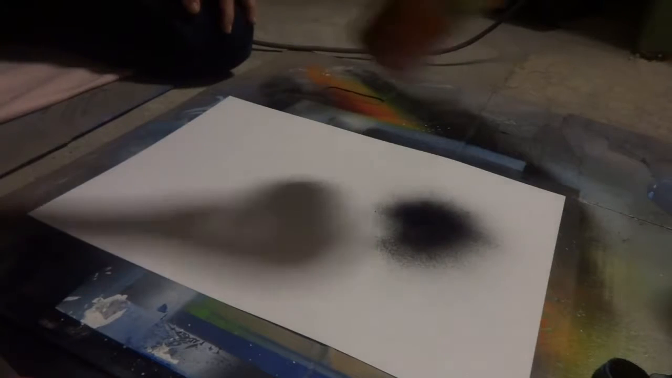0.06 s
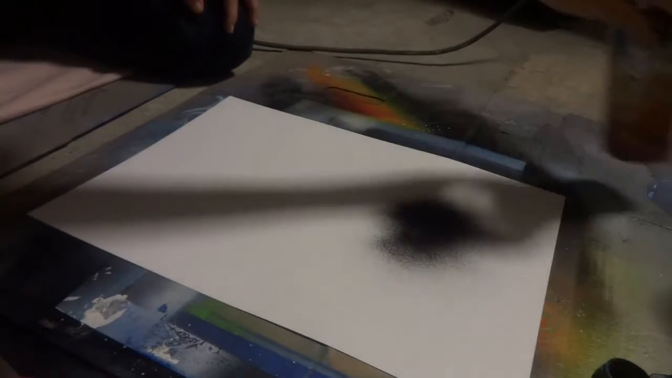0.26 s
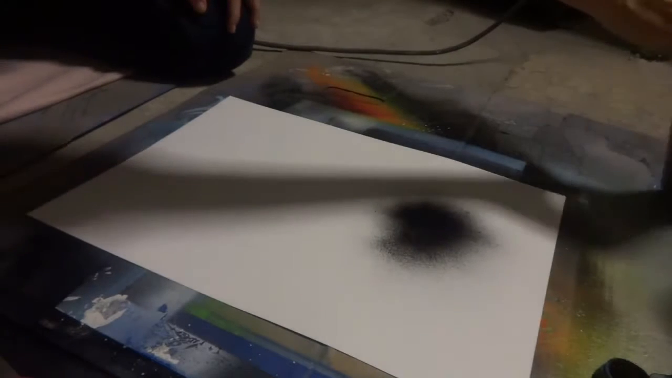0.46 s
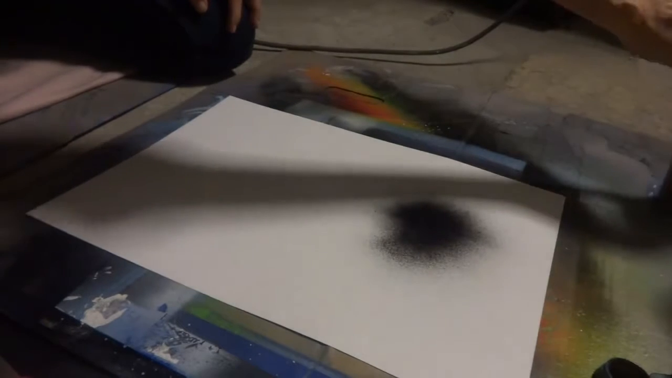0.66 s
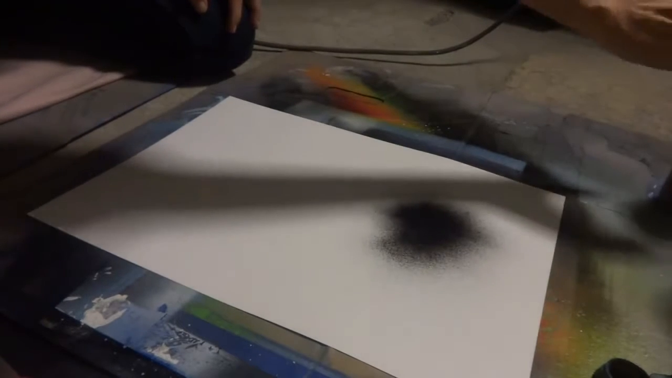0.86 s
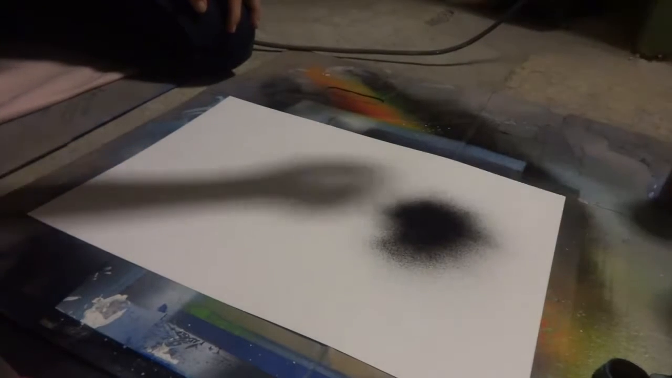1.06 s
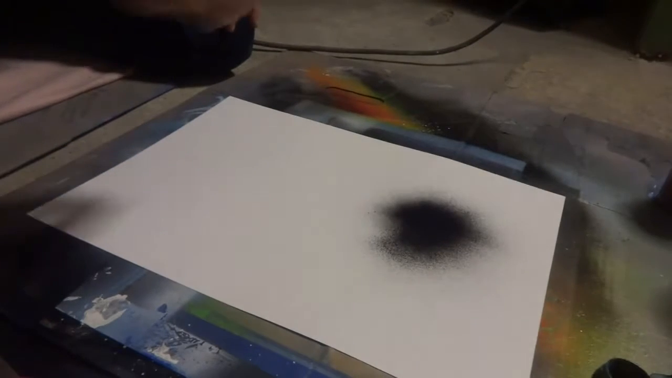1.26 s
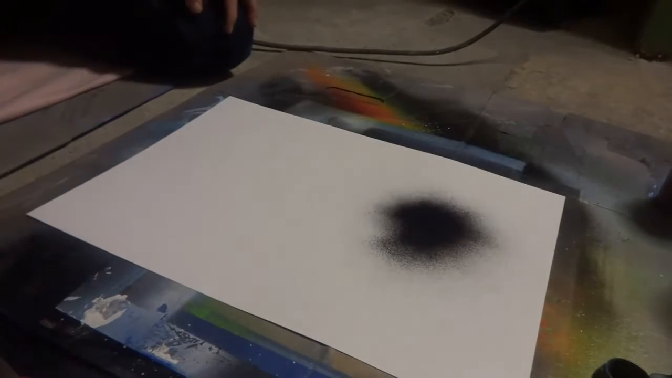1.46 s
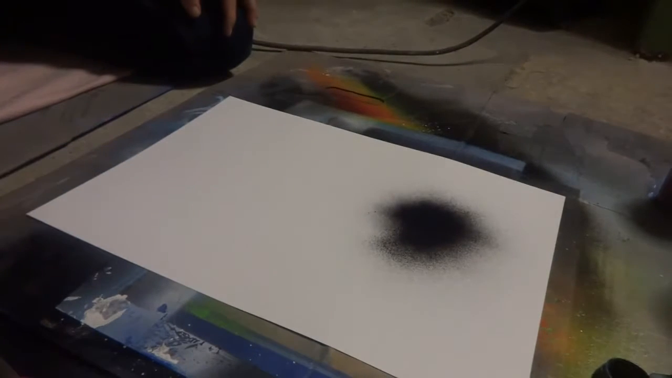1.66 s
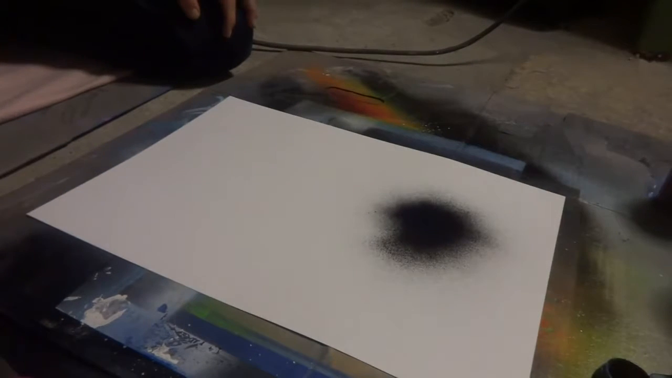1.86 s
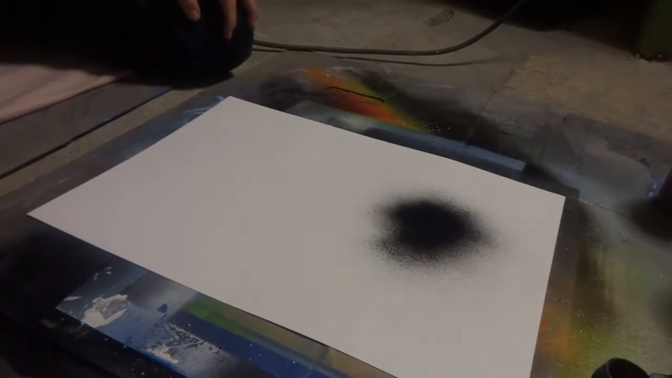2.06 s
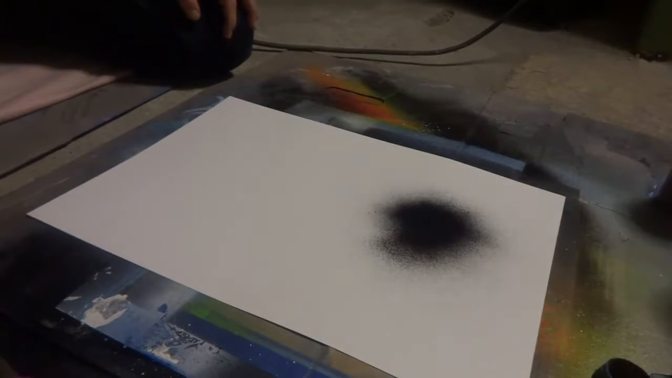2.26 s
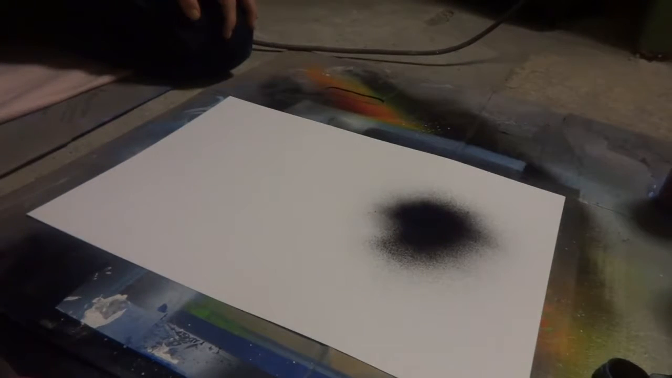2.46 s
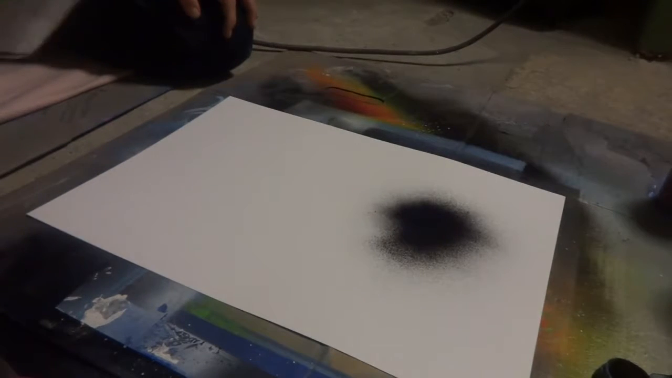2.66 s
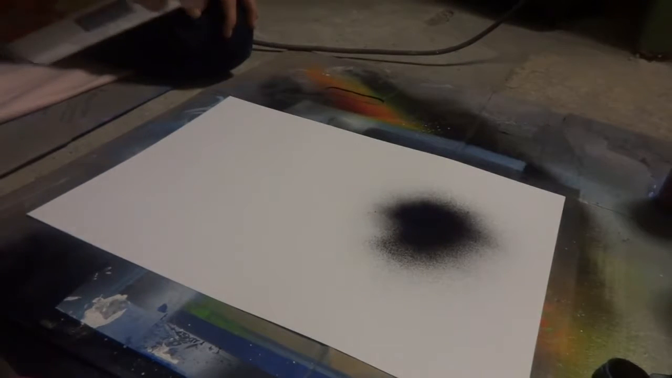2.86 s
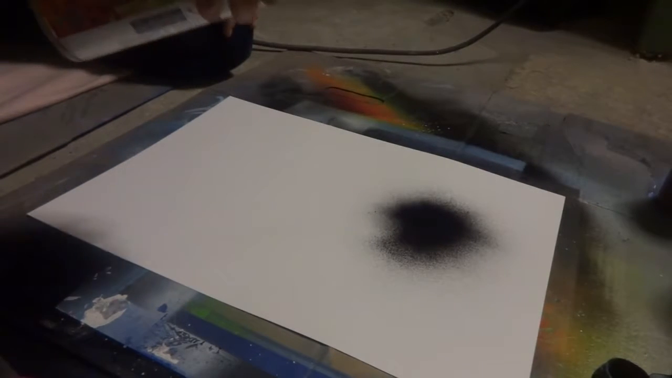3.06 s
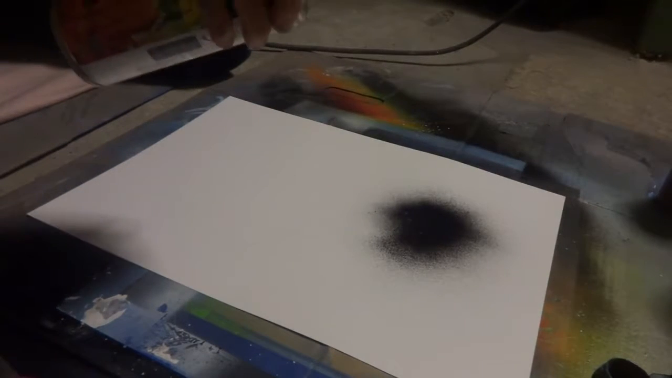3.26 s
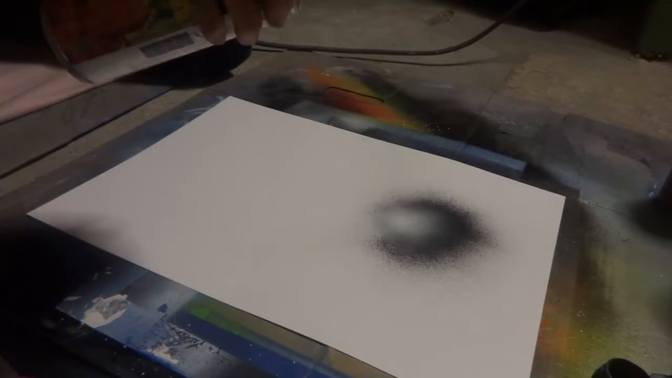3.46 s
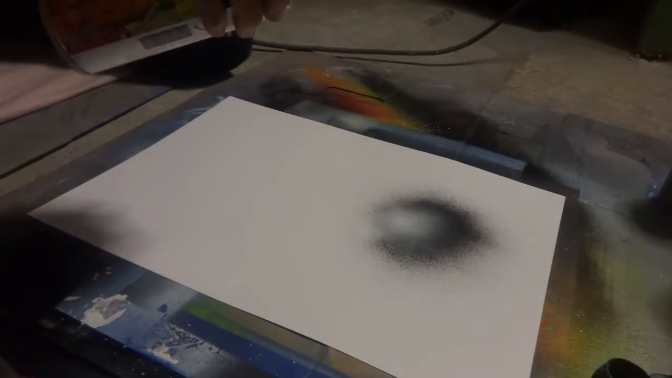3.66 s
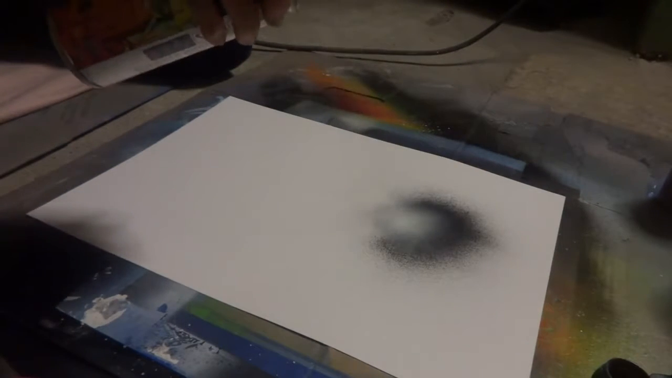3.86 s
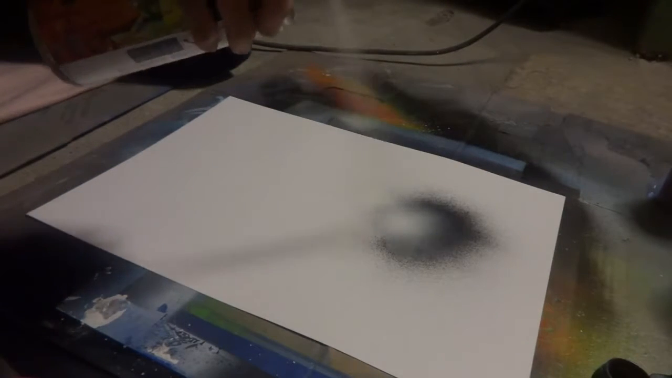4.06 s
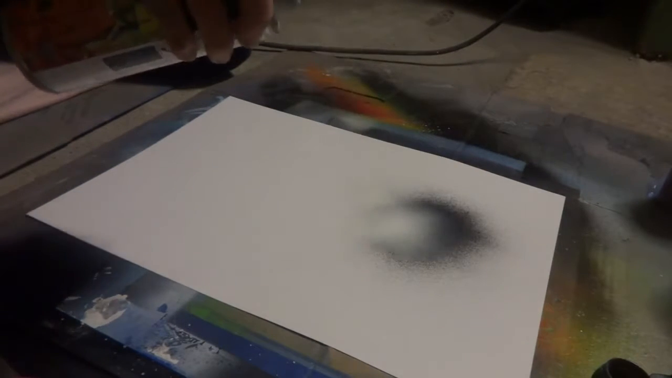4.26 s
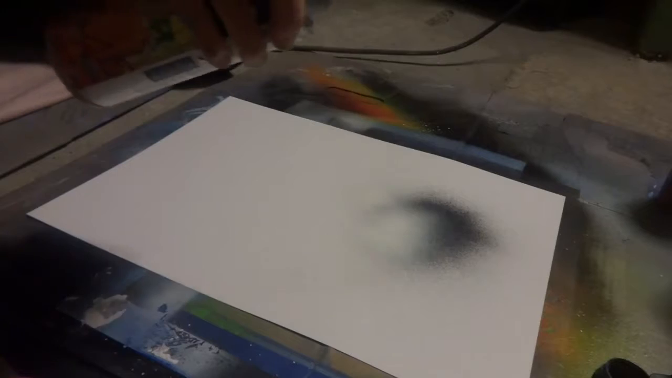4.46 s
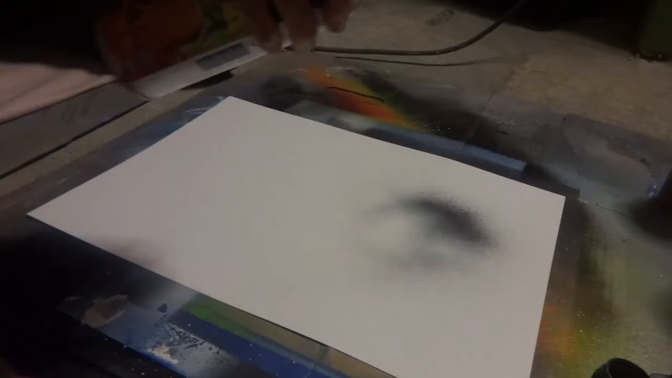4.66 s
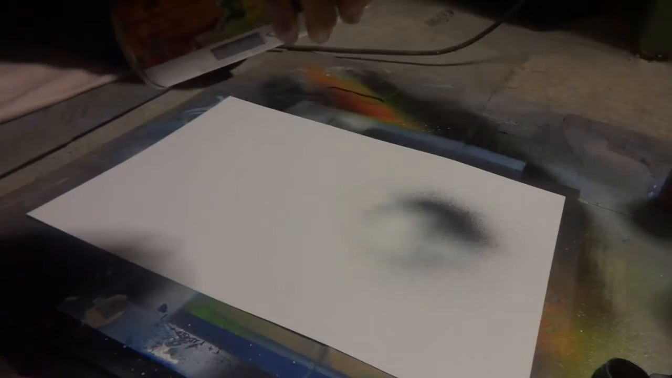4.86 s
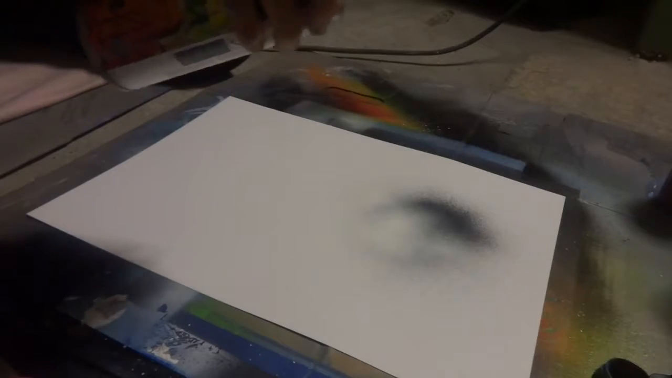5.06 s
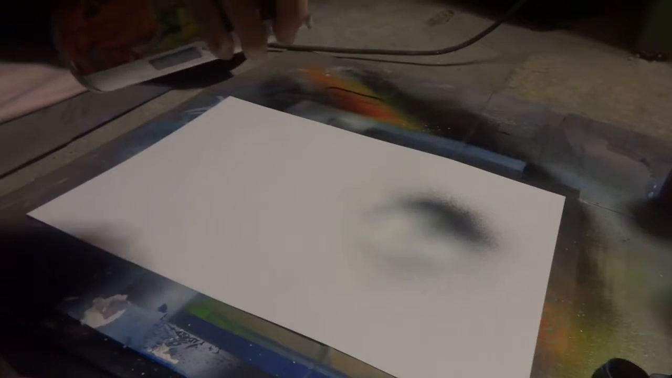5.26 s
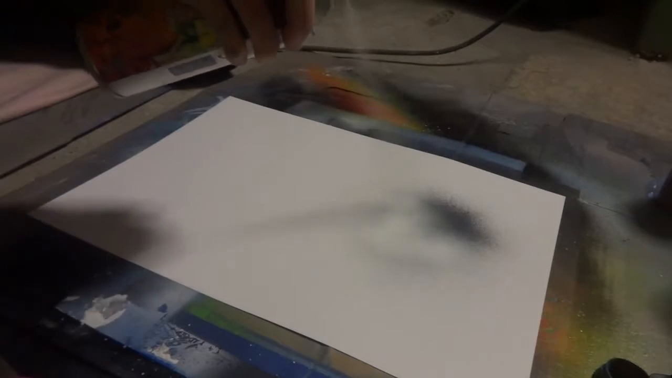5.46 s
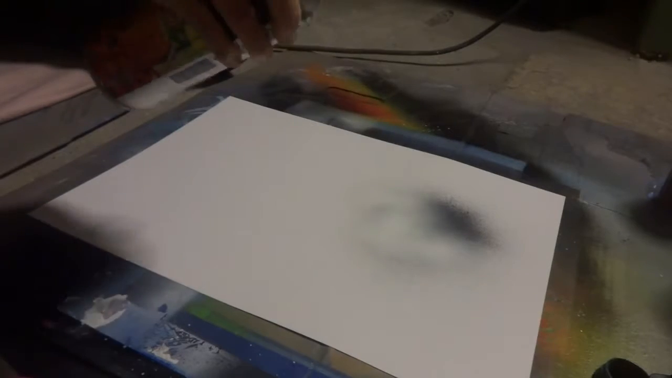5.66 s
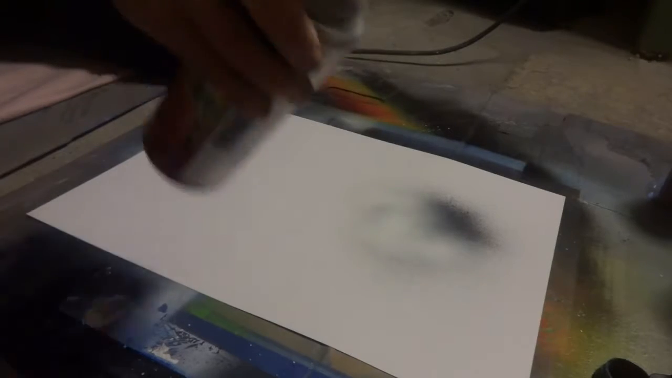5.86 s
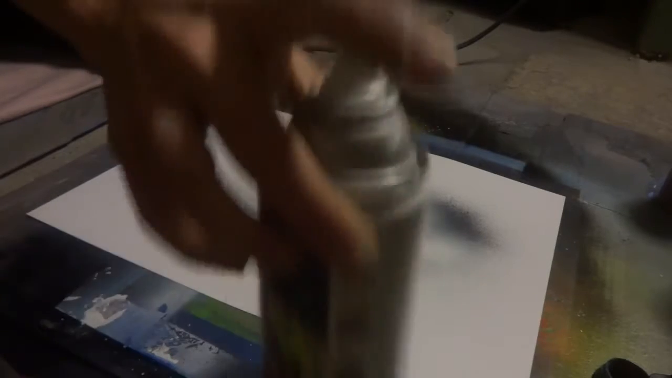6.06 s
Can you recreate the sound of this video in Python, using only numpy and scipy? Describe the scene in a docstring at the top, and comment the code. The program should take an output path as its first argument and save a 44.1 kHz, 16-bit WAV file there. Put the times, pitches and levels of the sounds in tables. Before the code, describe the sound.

A small workshop with a short echo and a soft low rumble is heard throughout, with the action close by. After a faint rustle and tap, a spray paint can is set on the floor at about 0.5 seconds with a few knocks and a soft thump. It rocks on its rim, slightly to the right, ticking and ringing until 1.1 seconds. Around 1.7 seconds another can slides faintly, then is knocked with a sharp clatter at 2 seconds. From 2.2 to 3 seconds it is lifted and tilted: the mixing ball rolls and clicks against the metal wall over light sleeve rustle. A weak puff at 3.1 seconds starts about eight short, bright hisses of paint onto paper, the loudest sounds, roughly three a second, with a brief pause near 4.9 and ending at 5.6. Faint ball rolling, two small clicks and rustling follow until about 6 seconds.

```python
"""Cans clatter, a mixing ball clicks, then eight short bursts of spray paint hiss in a small workshop.
One can is put down and rocks on its rim until it rests. Another slides, is knocked, and is picked up
and tilted, so the ball inside rolls and taps the wall, which rings. Each press of the nozzle lets out
a jet of swirling gas that hisses and rushes onto paper. The room echoes and rumbles softly."""
import sys
import numpy as np
from scipy import signal
from scipy.fft import rfft, irfft
from scipy.io import wavfile
from scipy.ndimage import uniform_filter1d, map_coordinates

SR = 44100
rng = np.random.default_rng(int(sys.argv[2]) if len(sys.argv) > 2 else 0)


def dump(signal):
    """Clip the signal to [-1, 1] and save it as 16-bit WAV at the path in sys.argv[1]."""
    limited = np.clip(np.atleast_2d(signal).T, -1, 1)
    pcm = np.round(limited * 32767).astype(np.int16)
    wavfile.write(sys.argv[1], SR, pcm)


N = 269892
TIME, FREQS = np.arange(N) / SR, np.fft.rfftfreq(N, 1 / SR)


def spray(closing_s=0.062, full_press_db=-23, sputter_db=0.87):
    """Each press opens a valve: swirling gas hisses out and rushes onto the paper."""
    # nozzle presses: t/s, opening time/s, length/s, level/dB, pressure swell/dB, floor echo delay/ms
    presses = [(3.079, 0.037, .126, -37.5, -1.5, .8), (3.353, 0.01, 0.081, -36, 0, 0.8),
               (3.376, 0.017, .141, -23.5, .5, .72), (3.72, .02, 0.16, -24.5, 1, 0.75),
               (4.051, .018, .17, -23.5, -0.5, 0.78), (4.321, 0.023, .152, -21, -1.1, 0.78),
               (4.57, 0.021, 0.13, -20.5, -2.5, 0.81), (5.126, 0.015, 0.16, -26, 3, 0.77),
               (5.417, 0.017, 0.14, -23, 0, 0.75)]
    # tone of the jet: f/Hz, level/dB
    jet_tone = [(300, -43.5), (1000, -30), (1700, -24), (2100, -14), (2400, -8.5), (3200, -10),
                (4400, -8.5), (5500, -6.5), (8000, -3), (10200, -1), (13000, 1.5), (15800, -3)]
    # resonances of the can and nozzle: f/Hz, width/Hz, boost/dB
    nozzle_modes = [(2365, 500, -1), (3980, 270, -0.5), (4770, 470, 2.5), (6090, 720, 4), (8060, 750, 3),
                    (9080, 520, -5), (10200, 1120, 4)]
    # tone of the jet hitting the paper: f/Hz, level/dB
    paper_tone = [(200, -13), (550, -6), (900, -2.5), (1500, 1.5), (2200, 5), (4000, -16), (8000, -27)]
    # echoes off farther surfaces: delay/ms, level/dB
    surfaces = [(1.999, -15), (3.7, -21.5), (5.199, -19)]
    nozzle_db = sum(db * np.exp(-(2 * (FREQS - hz) / width) ** 2) for hz, width, db in nozzle_modes)
    tone_db = look_up(jet_tone, FREQS) + nozzle_db
    octaves = np.log2(np.maximum(FREQS, 2000) / 9000)
    gas, jet = rfft(rng.standard_normal(N)), np.zeros(N)
    rush = normalise(filtered(rng.standard_normal(N), look_up(paper_tone, FREQS) + bass_cut(FREQS, 250)))
    for start, opening, length, db, swell_db, echo_ms in presses:
        t, force_db = TIME - start, db + swell_db - full_press_db
        # the valve leaks a little before it gives way, and its spring shuts it smoothly
        valve = np.clip(t / opening, 0, 1) ** 2.15
        valve *= np.sin(np.pi / 2 * np.clip((length - t) / closing_s, 0, 1)) ** 2
        swell = np.sin(np.pi * np.clip(t / length, 0, 1))
        # the floor echo depends on the nozzle's height, so each burst has its own tone
        floor_echo = amp(-11) * np.exp(-2j * np.pi * FREQS * echo_ms / 1000)
        tilt_db = 0.26 * force_db * octaves  # a lighter press is duller
        hiss = normalise(irfft(gas * amp(tone_db + tilt_db) * (1 + floor_echo), N))
        hiss_db = db + swell_db * (2 * swell - 1)
        rush_db = -51.5 + 1.8 * force_db + 5 * (swell - 1)
        jet += valve * (amp(hiss_db) * hiss + amp(rush_db) * rush)
    jet *= amp(sputter_db * drift(rate_hz=280))
    # the echo delays waver as the hand sways
    return jet + sum(amp(db) * delayed(jet, ms * (1 + 0.0297 * drift(1.96))) for ms, db in surfaces)


def knocks(thump_hz=88, thump_fade_s=0.12):
    """Cans hit the floor and each other: a bouncing crack, a chattering rim, sometimes a thump."""
    # hits: t/s, relative level/dB, treble cutoff/Hz, pitch of the struck spot/Hz, its boost/dB
    hits = [(.009, -49, 3500, 1280, 8), (.421, -53.5, 2500, 1340, 11), (.449, -43, 1670, 1380, 11),
            (0.6169, -35.5, 2280, 556, 9), (.625, -37.5, 2600, 1250, 15.5), (.841, -48, 5000, 2610, 2),
            (.888, -51, 5000, 900, 7), (1.933, -48.5, 5000, 1500, 4), (1.9448, -29, 4000, 1010, 5),
            (1.977, -26, 4730, 1640, 7.5), (2.0208, -31, 6100, 800, 3)]
    # tone of every knock: f/Hz, level/dB
    knock_tone = [(60, -23), (200, -10.5), (400, -2.5), (700, 1.5), (1150, -5), (1700, -4.5), (2500, -2),
                  (3800, -2), (5000, -9.5), (6500, -3.5), (10000, -6), (15500, -15)]
    # the floor thumps under a can that is put down: t/s, level/dB
    thumps = [(.449, -47.5), (0.6174, -55)]
    t, out = np.arange(SR // 3) / SR, np.zeros(N)
    for start, db, cutoff_hz, spot_hz, boost_db in hits:
        contact = bounces(t) + amp(-19) * crack(t, decay_s=0.015)  # the longer crack is the chatter
        knock = filtered_hit(contact, lambda hz: look_up(knock_tone, hz) + treble_cut(hz, cutoff_hz)
                             + boost_db / (1 + (5 * (hz / spot_hz - 1)) ** 2))
        add(out, start, at_level(knock, db - 1))
    for start, db in thumps:
        add(out, start, amp(db) * fade(t, thump_fade_s) * np.sin(2 * np.pi * thump_hz * t))
    return out


def bounces(t, crack_s=0.0022, gap_s=0.004, first_db=-11, loss_db=4.5):
    """A can hits once, then bounces three times at uneven gaps, weaker each time."""
    contact = crack(t, crack_s)
    for k, start in enumerate(np.cumsum(gap_s * rng.uniform(0.5, 1.5, 3))):
        add(contact, start, amp(first_db - k * loss_db) * crack(t, crack_s))
    return contact


def crack(t, decay_s):
    """Two hard things touch: a brief burst of noise, about equally strong at all pitches."""
    burst = rfft(rng.standard_normal(len(t)) * np.exp(-t / decay_s))
    even = irfft(burst / (abs(burst) + 1e-9), len(t))
    return even * np.exp(-(t / (4 * decay_s)) ** 2) * np.sqrt(decay_s * SR / 2)


def rocking_can():
    """The standing can rocks, and rings each time its rim taps the floor."""
    # taps of the rim: t/s, relative level/dB
    taps = [(.7515, -39.5), (.807, -41.5), (.824, -48), (.9395, -36), (1.024, -39.5), (1.1045, -45),
            (1.127, -51)]
    # ringing tones of the can: f/Hz, level/dB, time to fade by 60 dB/s
    modes = [(573, 4, 0.061), (660, 9, 0.026), (840, -12.5, 0.032), (919, -8.5, 0.56), (1300, -10.5, 0.081),
             (1857, -8, 0.07), (1960, -12.5, 0.17), (2690, -8, 0.13), (2820, -21, .05), (4270, 4, 0.032),
             (4500, -4.5, 0.024), (4640, -0.5, 0.041), (5604, -1.5, 0.04), (5800, -16, 0.12),
             (7000, -16, .04)]
    return amp(-0.5) * struck_can(taps, modes, tick_db=8.5, tick_s=0.0028, tick_hz=4900, low_hz=293,
                                  vary_db=-1.0, detune=0.0035, bright_hz=6200, octave_db=7.5)


def ball_clicks():
    """The mixing ball strikes the wall of the held can; the hand damps the ringing."""
    # strikes of the ball: t/s, relative level/dB
    clicks = [(2.2544, -52), (2.4529, -39), (2.6435, -36), (2.698, -39), (2.712, -43), (2.735, -44.5),
              (2.795, -46), (2.817, -47), (2.823, -41), (2.9588, -30), (5.683, -54), (5.987, -53.5)]
    # ringing tones of the can: f/Hz, level/dB, time to fade by 60 dB/s
    modes = [(2004, -10, 0.056), (2363, -6.5, 0.052), (2670, -8, 0.051), (3140, -2.5, 0.055),
             (3420, -8.5, 0.076), (3570, -9, 0.039), (4430, 4, 0.033), (4760, 1, 0.026), (4790, -3, 0.067),
             (5140, -10, .05), (6930, -12, 0.026), (7620, -3, 0.04), (8030, -7.5, 0.05), (9076, -27, .04),
             (11800, -24, .05)]
    return amp(-1.5) * struck_can(clicks, modes, tick_db=8.0, tick_s=0.0017, tick_hz=9100, low_hz=1660,
                                  vary_db=3, detune=0.0095, bright_hz=10400, octave_db=14)


def struck_can(blows, modes, tick_db, tick_s, tick_hz, low_hz, vary_db, detune, bright_hz, octave_db):
    """Each blow ticks and rings the can, a little differently each time as the paint sloshes."""
    t, out = np.arange(SR // 2) / SR, np.zeros(N)
    mode_hz, mode_db, fade_s = np.transpose(modes)[:, :, None]
    hardest_db = max(db for start, db in blows)
    for start, db in blows:
        cutoff_hz = bright_hz * 2 ** ((db - hardest_db) / octave_db)  # softer blows are duller
        size, shift, phase = rng.standard_normal((3, *mode_hz.shape))
        tones = np.sin(2 * np.pi * (mode_hz * (1 + detune * shift) * t + phase))
        ring = (amp(mode_db + vary_db * size) * fade(t, fade_s) * tones).sum(0)
        tick = amp(tick_db) * filtered_hit(crack(t, tick_s), lambda hz: treble_cut(hz, tick_hz))
        blow = filtered_hit(ring + tick, lambda hz: treble_cut(hz, cutoff_hz) + 2 * bass_cut(hz, low_hz))
        add(out, start, at_level(blow, db))
    return out


def rolling_ball(level_db=-3, sag_per_s=0.15):
    """The ball skips along the wall and keeps it ringing; running paint lowers the pitch."""
    # one roll for each tilt of the can: t/s, length/s, relative level/dB, pitch factor
    rolls = [(0, .25, -67.5, 1.08), (2.19, 0.21, -59, 0.96), (2.37, .18, -54, 0.92),
             (2.595, .29, -52.5, 0.91), (5.665, 0.2, -64.5, .98), (5.785, 0.042, -53, 0.98)]
    # resonances of the wall, before the pitch factor: f/Hz, width/Hz, level/dB
    modes = [(2415, 290, 7), (3160, 370, -3.5), (3650, 370, -1), (4570, 270, -11), (4940, 620, -4),
             (7860, 4400, -15.5)]
    ring = resonate(grains(per_s=2500, spread_db=2.0), modes)
    gain, pitch = np.zeros(N), np.ones(N)
    for start, length, db, factor in rolls:
        gain += movement(start, length, db)
        from_middle_s = np.minimum(TIME - start, length) - length / 2
        pitch = np.where(TIME < start, pitch, factor * (1 - sag_per_s * from_middle_s))
    return amp(level_db) * gain * map_coordinates(ring, [np.cumsum(pitch)], order=3, mode="wrap")


def rustle(level_db=-3):
    """Sleeve and fingers rub in many tiny contacts whenever the hand moves."""
    # moves of the hand: t/s, length/s, relative level/dB
    moves = [(0, 0.046, -60), (0.088, 0.22, -61.5), (.155, 0.035, -59), (0.497, .018, -59),
             (0.587, .45, -63), (2.193, 0.81, -63.5), (5.718, 0.43, -63.5)]
    # tone of cloth and skin: f/Hz, level/dB
    cloth_tone = [(300, -15), (1300, -6), (2000, -8), (3000, 2.5), (6000, 4.5), (9000, 1.5), (15500, -4.5)]
    rubbing = normalise(filtered(grains(per_s=2200, spread_db=2.5), look_up(cloth_tone, FREQS)))
    return amp(level_db) * sum(movement(*move) for move in moves) * rubbing


def sliding_can():
    """Grit under the rim keeps a sliding can faintly ringing."""
    # resonances of the can: f/Hz, width/Hz, level/dB
    modes = [(1253, 72, 0), (1570, 24, -8), (1867, 48, -6)]
    ring = resonate(grains(per_s=2500, spread_db=3.5), modes)
    return movement(start=1.675, length=0.45, db=-70.5) * ring


def spray_echoes(hiss, turns_per_s=3):
    """The echoes change as the jet moves; it points at the paper, so less treble reaches the room."""
    # stereo width: f/Hz, side minus mid/dB
    width = [(500, -2), (1200, -3.5), (2200, -46), (3500, -27), (4800, -7.5), (7000, -7.5), (10000, -8.5),
             (15000, -20.5)]
    # hiss that reaches the room: f/Hz, gain/dB
    spill = [(1000, -4), (3000, -8), (6000, -7.5), (12000, -13.5)]
    spilled = filtered(hiss, look_up(spill, FREQS))
    angle = 2 * np.pi * turns_per_s * TIME
    return room(spilled * np.cos(angle), width) + room(spilled * np.sin(angle), width)


def room(x, width, echoes_per_s=5000, first_s=0.0023, build_s=0.0048):
    """Dense echoes build up quickly, then fade at a different speed for each pitch."""
    # how long the room rings: f/Hz, time to fade by 60 dB/s
    fade_times = [(150, 0.1368), (500, 0.17), (1300, 0.35), (3500, 0.3), (9000, 0.26), (15000, 0.21)]
    echoes = rng.choice([-1., 1.], (2, SR // 2)) * (rng.random((2, SR // 2)) < echoes_per_s / SR)
    hz, t, bands = signal.stft(echoes, SR, nperseg=256)
    tail = signal.istft(bands * fade(t, look_up(fade_times, hz)[:, None]), SR, nperseg=256)[1]
    tail *= np.clip((np.arange(tail.shape[1]) / SR - first_s) / build_s, 0, 1)
    tail /= np.linalg.norm(tail, axis=1, keepdims=True)
    mid, side = signal.fftconvolve(x[None], tail, axes=1)[:, :N]
    return stereo(mid, side, width)


def room_rumble(level_db=-61.0):
    """The room's low rumble slowly swells and sinks under a faint, even hiss."""
    # tone of the background: f/Hz, level/dB
    air_tone = [(25, -25.5), (40, -16), (52, -9.5), (70, -20), (100, 0), (130, -8.5), (170, -0.5),
                (240, -7), (310, -1), (400, -7.5), (520, -11.5), (700, -16.5), (2200, -22), (15800, -32.5)]
    # rise and fall of the rumble: t/s, relative level/dB
    swells = [(0.0, -56.5), (0.25, -66), (1.07, -58), (1.58, -63.5), (3.66, -62), (4.09, -67.5),
              (5.83, -61.5), (6.12, -64)]
    # stereo width: f/Hz, side minus mid/dB
    width = [(30, -16), (80, -15.5), (160, -9.5), (330, -3.5), (700, 2.5), (1400, 4), (6500, -3.5),
             (15000, -21)]
    mid, side = (normalise(filtered(rng.standard_normal(N), look_up(air_tone, FREQS))) for _ in range(2))
    air = amp(level_db) * stereo(mid, side, width)
    low = filtered(air, treble_cut(FREQS, 960))
    swell_db = np.interp(TIME, *np.transpose(swells))
    return air - low + low * amp(swell_db - swell_db.mean())


def movement(start, length, db, rise_share=0.11, fall_share=0.57):
    """Loudness of one movement as it speeds up, holds and slows down."""
    progress = (TIME - start) / length
    speed = np.clip(np.minimum(progress / rise_share, (1 - progress) / fall_share), 0, 1)
    return amp(db) * np.sin(np.pi / 2 * speed)


def grains(per_s, spread_db):
    """Tiny contacts of uneven size at random times."""
    size = amp(spread_db * np.minimum(rng.exponential(1, N), 4))
    return normalise(size * rng.standard_normal(N) * (rng.random(N) < per_s / SR))


def drift(rate_hz):
    """A smooth random wobble, up to about rate_hz swings a second."""
    return normalise(irfft(rfft(rng.standard_normal(N)) * np.exp(-(FREQS / rate_hz) ** 2), N))


def resonate(x, modes):
    """Keeps the pitches at which an object likes to ring."""
    peaks = sum(amp(db) / (1 + (2 * (FREQS - hz) / width) ** 2) for hz, width, db in modes)
    return normalise(irfft(rfft(x) * peaks, N))


def filtered(x, db):
    """Turns each pitch in FREQS up or down by its gain in dB."""
    return irfft(rfft(x) * amp(db), N)


def filtered_hit(x, db_at_hz):
    """Filters a short sound so that nothing rings before it starts (minimum phase)."""
    log_gain = np.log(amp(db_at_hz(abs(np.fft.fftfreq(4096, 1 / SR)))))
    taps = np.fft.ifft(np.exp(np.conj(signal.hilbert(log_gain)))).real
    return signal.fftconvolve(x, taps[:len(taps) // 2])[:len(x)]


def treble_cut(hz, cutoff_hz):
    """Gain in dB that dulls high pitches."""
    return -10 * np.log10(1 + (hz / cutoff_hz) ** 3)


def bass_cut(hz, cutoff_hz):
    """Gain in dB that thins low pitches."""
    return treble_cut(cutoff_hz, hz + 20)


def fade(t, fade_s):
    """Dies away by 60 dB in fade_s."""
    return np.exp(-np.log(1000) * t / fade_s)


def amp(db):
    """Decibels to gain."""
    return 10 ** (np.asarray(db) / 20)


def normalise(x):
    """Sets the average strength (rms) to 1."""
    return x / np.sqrt(np.mean(x ** 2) + 1e-20)


def at_level(x, db):
    """Sets the level of the loudest 4 ms."""
    return amp(db) * x / np.sqrt(uniform_filter1d(x ** 2, size=176).max())


def look_up(points, hz):
    """Reads between a table's rows on a log-frequency scale."""
    f, value = np.transpose(points)
    return np.interp(np.log(hz + 1), np.log(f + 1), value)


def add(mix, start, sound):
    """Mixes a sound in at start seconds."""
    part = mix[round(start * SR):][:len(sound)]
    part += sound[:len(part)]


def delayed(x, ms):
    """Delays by a time that may change."""
    return map_coordinates(x, [np.arange(N) - ms * SR / 1000], order=3)


def stereo(mid, side, width):
    """Left and right from what they share (mid) and what sets them apart (side)."""
    side = filtered(side, look_up(width, FREQS))
    return np.array([mid + side, mid - side])


def pan(x, left_db):
    """Makes the left side left_db louder than the right."""
    return x * amp([[left_db / 2], [-left_db / 2]])


def scene():
    """The standing can is to the right, the held one a little left, with the room all around."""
    # stereo width of the cans' echoes: f/Hz, side minus mid/dB
    width = [(300, -9), (800, -9), (3000, -7), (7000, -7), (15000, -14)]
    hiss, knock, handling = spray(), knocks() + sliding_can(), rolling_ball() + rustle()
    rock, ball = rocking_can(), ball_clicks()
    into_room = amp(-4.0) * knock + amp(-4.5) * rock + amp(-7) * ball + amp(-6.5) * handling
    echoes = spray_echoes(hiss) + room(into_room, width)
    direct = pan(hiss, -0.4) + pan(knock, 0.6) + pan(rock, -6.5) + pan(ball + handling, 1.9)
    return direct + echoes + room_rumble()


def record(dry):
    """Steeply cuts the treble above 15800 Hz."""
    return signal.oaconvolve(dry, signal.firwin(511, 15800, window=("kaiser", 7), fs=SR)[None], "same")


dry = scene()
out = record(dry)
dump(out)
```